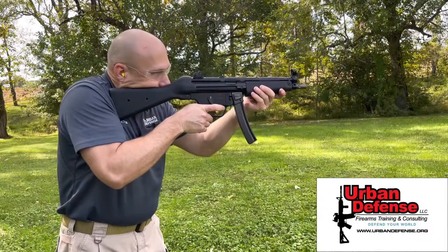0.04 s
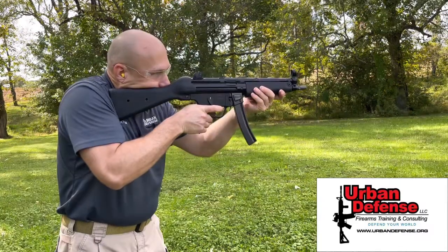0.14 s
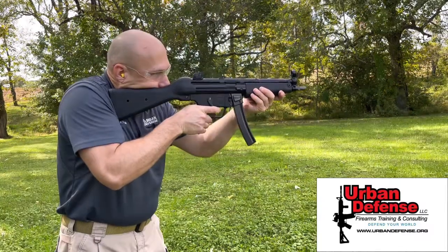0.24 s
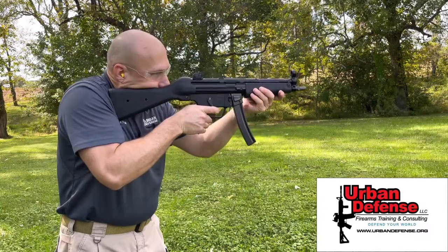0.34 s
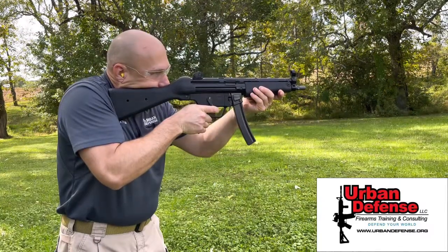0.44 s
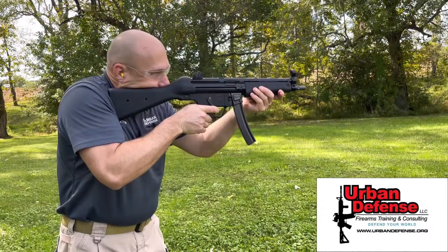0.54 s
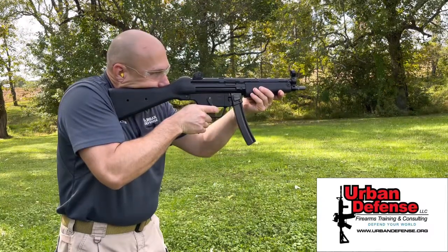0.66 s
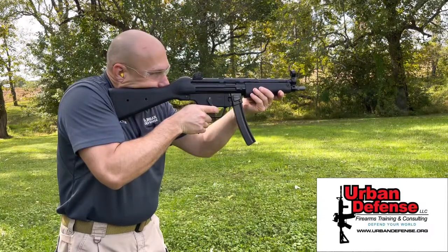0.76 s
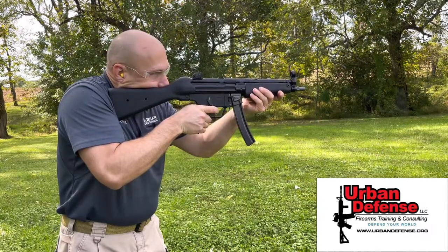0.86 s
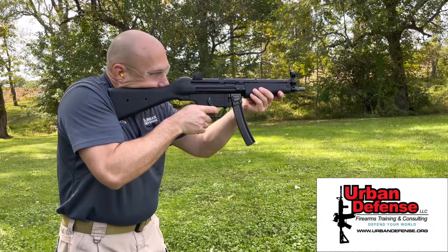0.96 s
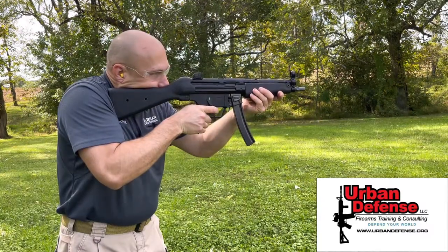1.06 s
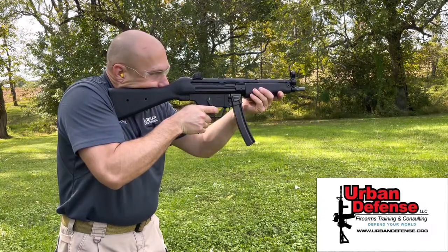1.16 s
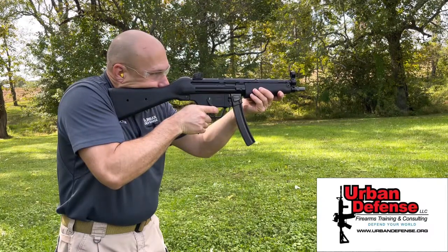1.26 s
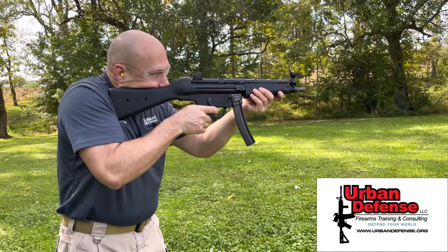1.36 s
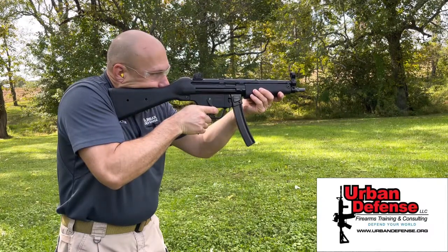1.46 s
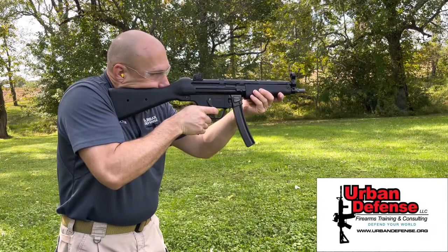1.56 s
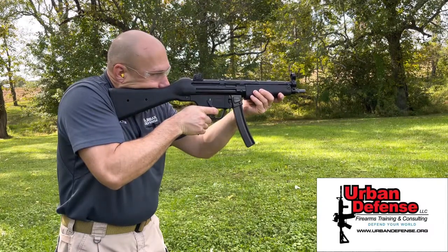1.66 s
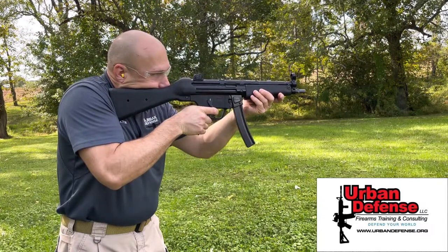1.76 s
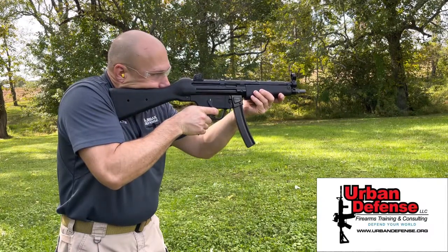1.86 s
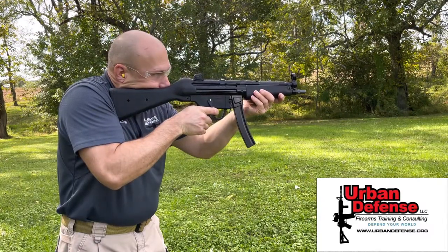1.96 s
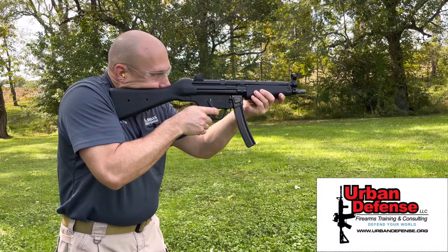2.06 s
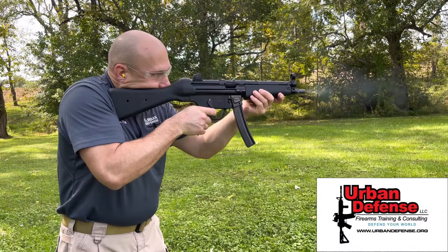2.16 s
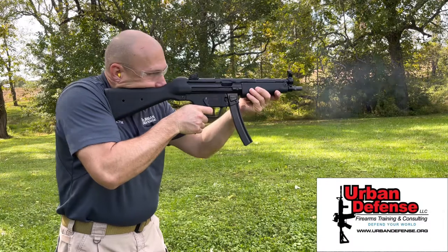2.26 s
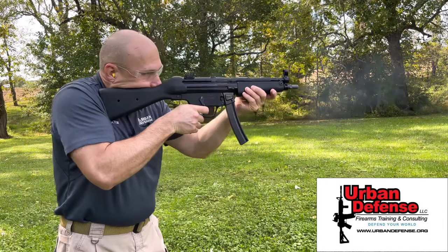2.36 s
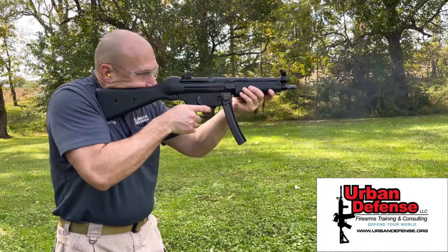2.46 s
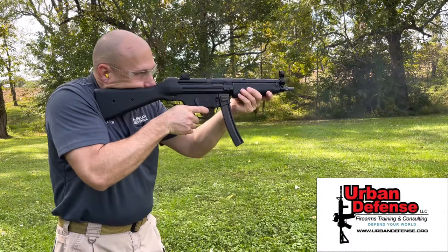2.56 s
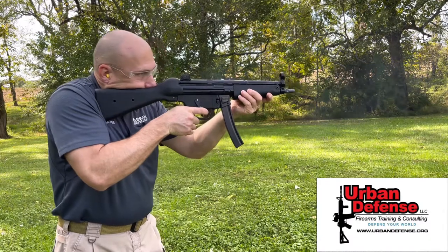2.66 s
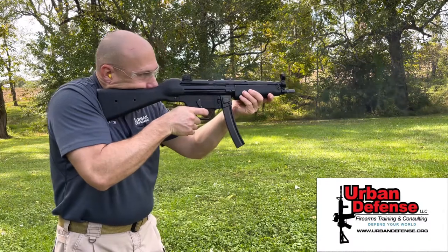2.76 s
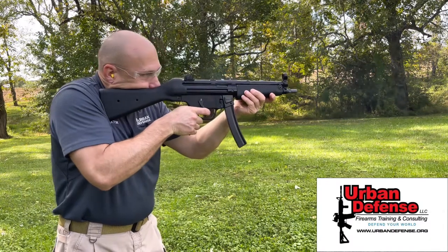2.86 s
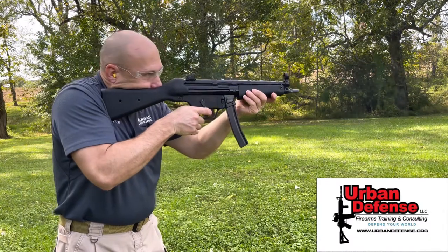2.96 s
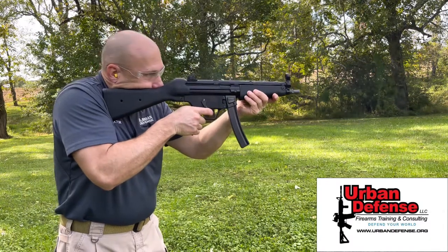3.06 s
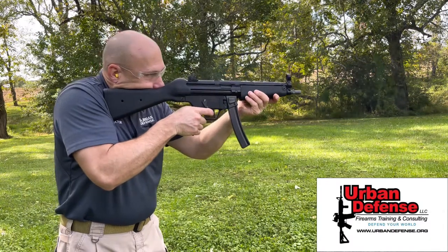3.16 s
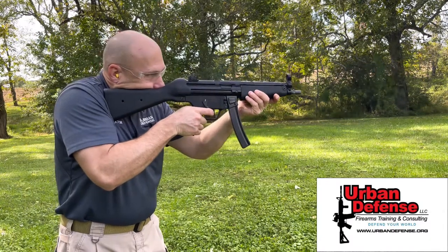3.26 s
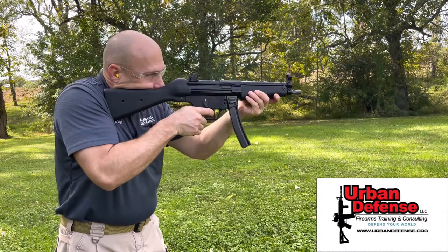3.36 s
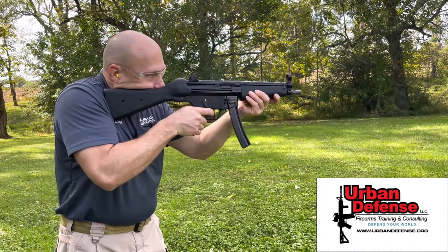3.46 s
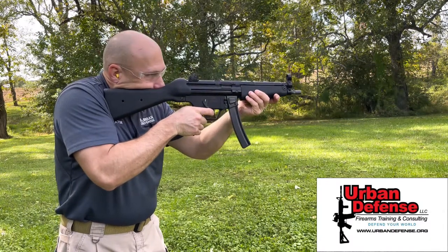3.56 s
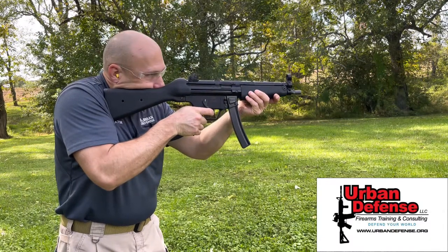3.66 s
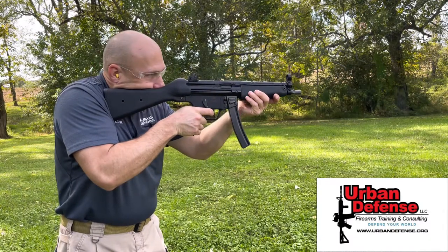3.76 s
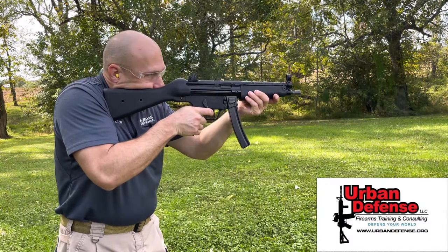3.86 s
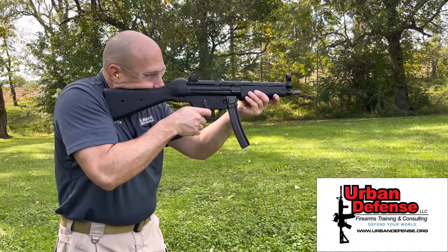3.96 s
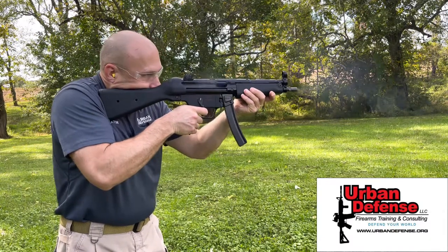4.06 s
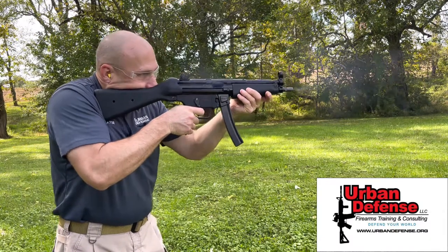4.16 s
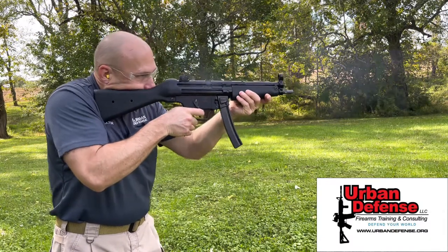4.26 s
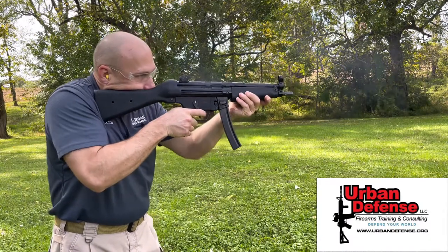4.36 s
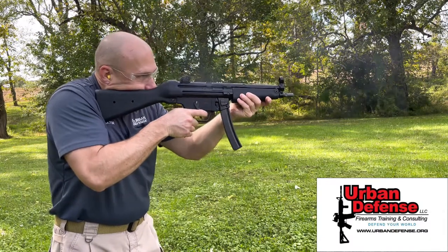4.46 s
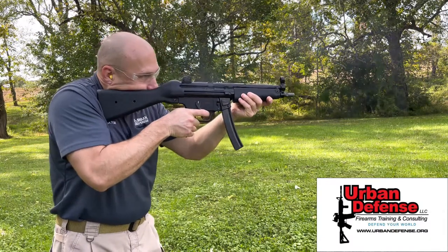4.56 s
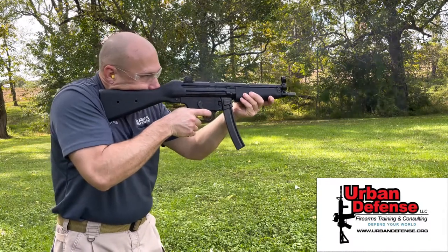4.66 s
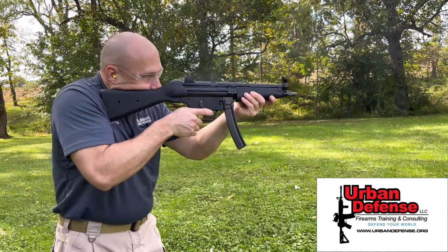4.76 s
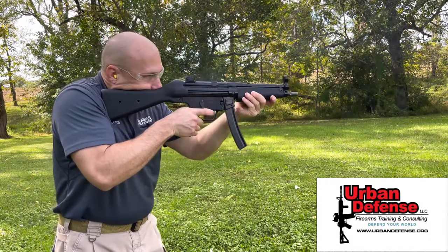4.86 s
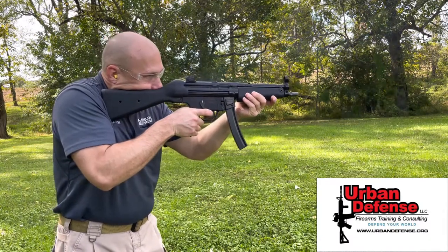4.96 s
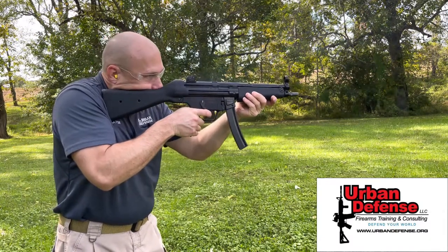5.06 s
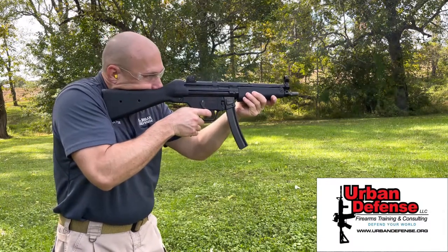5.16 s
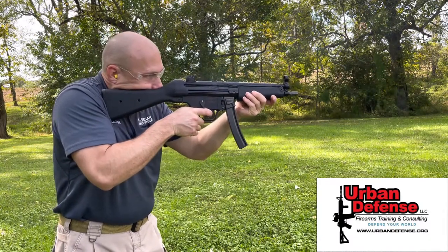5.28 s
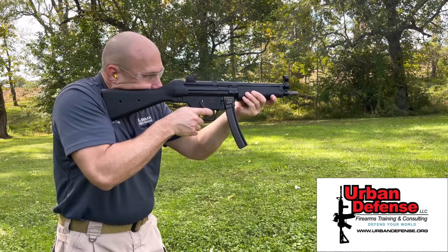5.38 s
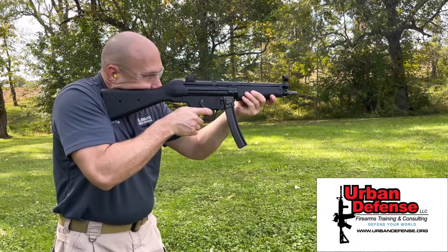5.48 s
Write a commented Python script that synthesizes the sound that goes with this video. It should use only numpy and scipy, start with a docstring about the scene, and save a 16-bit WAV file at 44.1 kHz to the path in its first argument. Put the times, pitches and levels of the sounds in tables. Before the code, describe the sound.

Quiet lawn with low motor hum and insects, then two rapid four-round submachine gun bursts echoing off trees, with small metal clicks between.

```python
"""A submachine gun fires two four-round bursts on a lawn ringed by trees; its bolt clacks between rounds.
Each blast is a dispersed pulse that sweeps downward, returns from the ground and a near surface,
and reverberates in the trees as decaying noise; small metal clicks, noise bursts and rings, follow.
A motor hums in sines and rumbling noise, insects and leaves hiss in filtered noise, a bird whistles
in falling sines; these are plain until the first shot slams the recorder's gain down."""
import sys
import numpy as np
from scipy import signal
from scipy.fft import rfft, irfft, next_fast_len
from scipy.io import wavfile

SR = 44100
rng = np.random.default_rng(int(sys.argv[2]) if len(sys.argv) > 2 else 0)


def to_wav(s):
    """Save 16-bit WAV."""
    ch = np.atleast_2d(s).T  # columns
    pcm = np.round(np.clip(ch, -1, 1) * 32767)  # PCM
    wavfile.write(sys.argv[1], SR, pcm.astype(np.int16))


N = 243415
TIME = np.arange(N) / SR  # s

# Distant motor, tonal lines: (f/Hz, level/dB)
MOTOR_LINES = [(74, -44), (110.3, -46.5), (126, -51.5), (220.7, -45)]
# Distant motor, rumble spectrum: (f/Hz, level/dB)
MOTOR_RUMBLE = [(20, -44.5), (35, -19.5), (55, 1.5), (90, 0.5), (135, -5), (175, -14), (250, -17),
                (310, -18), (600, -46), (2000, -72.5)]
# Chorus of far insects, spectrum: (f/Hz, level/dB)
INSECT_SPECTRUM = [(100, -2.5), (350, 2), (700, 5.5), (1150, 6.5), (1800, -3.5), (3400, -12), (5300, -15.5),
                   (6100, 5), (7500, -4), (8600, -8), (10000, -15), (12000, -30), (16000, -32)]
# Puffs of breeze in the leaves: (t/s at the peak, width/s, level/dB)
GUSTS = [(.61, 0.11, -61), (1.63, 0.165, -56)]
CALM_DB = -68  # the leaves between puffs
# Stirring leaves, spectrum: (f/Hz, level/dB)
LEAF_SPECTRUM = [(300, -21), (800, -3.5), (1200, 4.5), (1700, -4.5), (3400, -10.5), (4700, 5.5), (7000, 1),
                 (11000, -10.5), (16000, -27)]
# Swells of a faint far-off tone: (t/s at the peak, width/s, level/dB)
FAR_SWELLS = [(.55, 0.092, -51.5), (1.0, .07, -55.5)]
# Far-off tone, spectrum: (f/Hz, level/dB)
FAR_TONE_SPECTRUM = [(500, -30), (950, -3), (1200, -1), (1450, -14), (2200, -30), (8000, -60)]
# Nearer insect, narrow-band spectrum: (f/Hz, level/dB)
CRICKET_SPECTRUM = [(6000, -45), (8100, -13.5), (8550, 0), (9000, -14.5), (12000, -46.5)]
# Chirps of a far bird: (t/s, level/dB)
CHIRPS = [(.37, -67), (.85, -66), (1.334, -63), (1.971, -62)]
UPPER_VOICE_HZ, LOWER_VOICE_HZ = 4600, 3000  # nominal starting pitches of a chirp
CHIRP_FALL = .76  # nominal end pitch over start pitch

# Rounds fired: (t/s, strength/dB)
SHOTS = [(2.218, 2), (2.2917, 4), (2.3665, 3.5), (2.4440, 3), (4.0349, 2.5), (4.1080, 2), (4.1854, 0.1),
         (4.2584, -0.04)]
BURST_ROUNDS = 4
CYCLE_S = .0773  # one cycle of the action
LEAD_IN_S, LEAD_IN_DB = .0142, -6  # a rough noise starts this long before a burst's first round
BOLT_LEAD_S, BOLT_DB = 0.015, 11  # the bolt shuts this long before each cycle ends
LAST_BOLT_DB = 0.5  # extra: the closing that ends a burst is harder
RESET_S, RESET_DB = .1055, 3  # the trigger resets this long after a burst's last round
# Lead-in noise, spectrum: (f/Hz, level/dB)
LEAD_IN_SPECTRUM = [(30, -6.5), (200, 13), (330, 4.5), (520, 7.5), (720, -12), (950, 0), (1400, -9),
                    (2300, -0.5), (3100, -6), (4100, -25), (5300, -7.5), (7000, -3), (8500, -18),
                    (16000, -16.5)]
# Bolt closing and trigger reset, spectrum: (f/Hz, level/dB)
BOLT_SPECTRUM = [(60, -14.5), (200, -2), (700, -4), (1800, -1.5), (5300, -4.5), (7700, -4), (9500, 6.5),
                 (12000, 1.5), (16000, -3)]

# Muzzle blast, spectrum: (f/Hz, level/dB)
BLAST_SPECTRUM = [(25, -9.5), (50, -3.5), (120, 10), (200, 6), (400, 4), (620, 6), (1000, -6), (1900, -5),
                  (4000, -17), (9000, -21.5), (16000, -24)]
# Reflection from the near surface, spectrum: (f/Hz, level/dB)
SLAP_SPECTRUM = [(25, -16), (55, 4), (120, 6), (250, -5), (500, -3), (900, 0), (1600, -9), (3000, -14.5),
                 (8000, -27.5), (16000, -34.5)]
# Crack and scatter of the blast, spectrum: (f/Hz, level/dB)
CRACKLE_SPECTRUM = [(40, -17), (300, 2), (900, 6), (2000, 4), (3500, -5.5), (6000, -5.5), (10000, -8),
                    (16000, -5)]
# Action rattling as the bolt flies back, spectrum: (f/Hz, level/dB)
RATTLE_SPECTRUM = [(40, -4.5), (200, 7), (600, 9), (2000, 1.5), (4000, 0), (7000, -4), (10000, 0),
                   (16000, -3.5)]
# Blast at the far port relative to the near one: (f/Hz, level/dB)
FAR_PORT_SHADE = [(60, 2), (150, -2), (500, -3), (1500, -9), (5000, -9), (10000, 4)]
SLAP_DB, TREES_DB = 17, -2.5  # the echoes of a round of strength 0 dB

# Echo from the trees, spectrum: (f/Hz, level/dB)
TREE_SPECTRUM = [(25, -11), (50, -1), (110, -5), (290, -12.5), (520, -4), (1000, -6), (2100, -2),
                 (3300, -9.5), (5000, -6), (7500, -10), (10000, -2), (16000, -15.5)]
# Decay time of the trees' echo, for a fall of 60 dB: (f/Hz, T60/s)
TREE_T60 = [(50, .6), (200, 1.2), (600, 1.74), (2000, 1.455), (5000, 1), (9000, 0.61), (15000, 0.23)]
# Stands of trees that answer each shot: (delay/s, width/s, level/dB)
STANDS = [(.125, 0.011, 4.5), (0.241, 0.045, 3), (.32, 0.02, 6.5), (.43, 0.22, 6)]

# Clicks of spent cases and of handling: (t/s, tick level/dB, tick f/Hz, knock level/dB)
CLICKS = [(3.2317, -16.5, 5030, -36), (3.3725, -8, 2420, -11), (3.4204, -11, 2300, -15.5),
          (3.491, -25, 4500, -40), (3.53, -34, 2200, -25), (3.585, -26.5, 8400, -24.5),
          (3.717, -37, 2200, -28.5), (4.991, -10.5, 3120, -16.5), (5.137, -21, 5120, -47),
          (5.326, -22.5, 1990, -17)]
# Tick of steel, spectrum before its resonance: (f/Hz, level/dB)
TICK_SPECTRUM = [(100, 7), (1200, -4), (2700, 5), (3800, -2), (5200, 0), (7000, 2.5), (9000, -8.5),
                 (16000, -6.5)]
# Duller knock, spectrum: (f/Hz, level/dB)
KNOCK_SPECTRUM = [(60, -6), (300, -1.5), (570, 3), (1000, 0), (2000, 0), (3500, -15.5), (8000, -23),
                  (16000, -18)]
# Ringing modes of the metal: (f/Hz, level/dB, T60/s)
METAL_MODES = [(626, -5, 0.2), (1880, -21, 0.062), (2100, 0, 0.055), (2340, 0, 0.097), (4540, -5, 0.056),
               (7000, -6, 0.075), (8370, -5, 0.058)]
TICK_T60, KNOCK_T60, RING_DB = 0.034, .11, -8  # decays (s); the metal's ring relative to the knock
TICK_RISE_DB, TICK_OCTAVES = 10, 0.25  # height and width of the resonance that gives a tick its pitch

# Stereo width of diffuse noise: (f/Hz, side minus mid level/dB)
STEREO_WIDTH = [(50, -13.5), (130, -15), (250, -4.5), (500, 4), (1000, 6), (2000, 0), (4000, 0),
                (16000, -1)]
# Recorder's own hiss, spectrum: (f/Hz, level/dB)
HISS_SPECTRUM = [(30, -16), (130, 8.5), (500, 0.5), (1800, 0), (3500, -7.5), (8000, -14.5), (11000, -15),
                 (16000, -20)]
# Microphone's frequency response: (f/Hz, level/dB)
MIC_RESPONSE = [(7200, -1.5), (8700, 4), (9700, 2), (10300, -7.5), (11000, 3.5), (12200, -2), (13600, -24),
                (15000, -18), (16000, -18.5)]
TOP_HZ = 16050  # middle of the upper band edge


def amp(db):
    """Amplitude ratio: twenty decibels make a factor of ten."""
    return 10 ** (np.asarray(db) / 20)


def unit(x):
    """Normalization: scale to rms 1."""
    return x / np.sqrt(np.mean(x ** 2) + 1e-20)


def along(points, hz):
    """Interpolation of (f/Hz, value) points on a logarithmic frequency axis."""
    f, v = np.transpose(points)
    return np.interp(np.log(hz + 1), np.log(f + 1), v)


def filtered(x, response):
    """Linear filtering: the spectrum of x times a response that is a function of frequency."""
    n = x.shape[-1]
    m = next_fast_len(n + SR // 4)
    spectrum = rfft(x, m) * response(np.fft.rfftfreq(m, 1 / SR))
    return irfft(spectrum, m)[..., :n]


def noise(spectrum, size):
    """Diffuse field: coloured stereo noise of rms 1, alike in the bass and wide in the mids."""
    m = next_fast_len(size, real=True)
    hz = np.fft.rfftfreq(m, 1 / SR)
    angle = np.arctan(amp(along(STEREO_WIDTH, hz)))  # shares the power between mid and side
    gain = amp(along(spectrum, hz)) * np.array([np.cos(angle), np.sin(angle)])
    white = rng.standard_normal((2, m))
    mid, side = irfft(rfft(white) * gain, m)[:, :size]
    return unit(np.array([mid + side, mid - side]))


def wobble(rate, size):
    """Slow random fluctuation: straight lines through rate normal knots a second."""
    knots = rng.standard_normal(int(size * rate / SR) + 2)
    return np.interp(TIME[:size] * rate, np.arange(len(knots)), knots)


def swells(rows):
    """Gaussian envelopes: summed gain of (t/s, width/s, level/dB) swells."""
    return sum(amp(db) * np.exp(-((TIME - s) / width) ** 2) for s, width, db in rows)


def add(track, s, sound):
    """Superposition: mix a sound into the track from time s on."""
    part = track[:, round(s * SR):][:, :sound.shape[-1]]
    part += sound[..., :part.shape[-1]]


def pan(right_db):
    """Level difference between channels: gains for a source that leans to the right."""
    return amp([[-right_db / 2], [right_db / 2]])


def noise_burst(spectrum, t60, attack, size=7200):
    """Damped impact: coloured noise rises fast, decays exponentially and tapers to nothing."""
    t = TIME[:size]
    rise = 1 - np.exp(-t / attack)
    decay = amp(-60 * t / t60)
    taper = 1 - (t / t[-1]) ** 2
    return noise(spectrum, size=size) * decay * rise * taper


def shock(spectrum, lag, corner_hz, turn, spread, size=8192):
    """Dispersion: a pressure pulse whose bass arrives up to lag (s) late sweeps downward."""
    hz = np.fft.rfftfreq(size, 1 / SR)
    # the delay at each frequency is lag / (1 + hz / corner_hz); turn is a constant phase (rad)
    phase = turn - 2 * np.pi * lag * corner_hz * np.log1p(hz / corner_hz)
    near = amp(along(spectrum, hz)) * np.exp(1j * phase)
    # spread is the phase between the ports (rad)
    far = near * amp(along(FAR_PORT_SHADE, hz)) * np.exp(1j * spread)
    pulse = irfft(np.array([far, near]))[:, :size // 2]
    return pulse / np.sqrt(np.sum(pulse ** 2) / (SR / 100))  # equal energy for every pulse


def background(port_delay=0.00061):
    """Incoherent sum: motor lines and rumble under insects, stirring leaves and a faint far-off tone."""
    hum = np.zeros(N)
    for hz, db in MOTOR_LINES:
        level = amp(db + 1.3 * wobble(6.7, size=N)) * np.sqrt(2)  # rms to peak
        hum += level * np.sin(2 * np.pi * hz * TIME + .3 * wobble(3.5, size=N))
    # the hum reaches the left port first, the right one port_delay (s) later
    hum = np.array([hum, np.interp(TIME - port_delay, TIME, hum)])
    rumble = amp(-44.5) * noise(MOTOR_RUMBLE, size=N)
    insects = amp(-51.5 + 1.4 * wobble(21, size=N)) * noise(INSECT_SPECTRUM, size=N)
    leaves = (amp(CALM_DB) + swells(GUSTS)) * noise(LEAF_SPECTRUM, size=N)
    far_tone = swells(FAR_SWELLS) * noise(FAR_TONE_SPECTRUM, size=N)
    return (hum + rumble) * pan(.8) + (insects + leaves + far_tone) * pan(0.9)


def cricket(rate=4.0, first_s=.015, db=-64):
    """Amplitude modulation: one nearer insect pulses narrow-band noise, rate chirps a second."""
    chirping = np.cos(np.pi * rate * (TIME - first_s)) ** 4
    return amp(db) * chirping * noise(CRICKET_SPECTRUM, size=N)


def bird(length=0.041, waver=0.043):
    """Frequency modulation: quick two-voiced whistles fall in pitch with a random waver."""
    out = np.zeros((2, N))
    u = np.linspace(0, 1, round(length * SR))  # progress through a chirp
    for s, db in CHIRPS:
        for start_hz in (UPPER_VOICE_HZ, LOWER_VOICE_HZ):
            pitch = start_hz * CHIRP_FALL ** u * (1 + waver * wobble(265, size=len(u)))
            whistle = np.sin(2 * np.pi * np.cumsum(pitch) / SR)
            add(out, s, amp(db) * np.sin(np.pi * u) * whistle)
    return out


def action():
    """Damped noise: a rough lead-in to each burst, the bolt closing in every cycle, the trigger reset."""
    out = np.zeros((2, N))
    for rounds in np.reshape([s for s, _ in SHOTS], (-1, BURST_ROUNDS)):
        # a rough noise burst starts just before a burst's first round
        lead_in = noise_burst(LEAD_IN_SPECTRUM, t60=0.66, attack=0.0033)
        add(out, rounds[0] - LEAD_IN_S, amp(LEAD_IN_DB) * lead_in)
        # a cycle ends at the next round, or after CYCLE_S when there is none
        cycles = [(s, 0) for s in rounds[1:]] + [(rounds[-1] + CYCLE_S, LAST_BOLT_DB)]
        for cycle_end, extra_db in cycles:
            bolt = noise_burst(BOLT_SPECTRUM, t60=0.026, attack=0.0003)
            add(out, cycle_end - BOLT_LEAD_S, amp(BOLT_DB + extra_db) * bolt)
        reset = noise_burst(BOLT_SPECTRUM, t60=0.045, attack=0.0011)
        add(out, rounds[-1] + RESET_S, amp(RESET_DB) * reset)
    return out


def blasts(ground_delay=.0048, slap_delay=.0192, stray_db=4, stray_spread=0.022):
    """Reflection: a blast arrives directly, off the ground and off a near surface, trailing crackle."""
    out = np.zeros((2, N))
    slap = shock(SLAP_SPECTRUM, lag=0.018, corner_hz=92, turn=0.71, spread=2.13)
    # gun and shooter scatter every round in the same way
    scatter = noise_burst(CRACKLE_SPECTRUM, t60=0.12, attack=0.0016)
    for s, db in SHOTS:
        turn = 1.6 + rng.normal(0, 0.92)
        pulse = shock(BLAST_SPECTRUM, lag=.021, corner_hz=102.8, turn=turn, spread=1.75)
        crack = noise_burst(CRACKLE_SPECTRUM, t60=0.036, attack=0.00045) * pan(15.0)
        add(out, s, amp(db + 19.0) * pulse)
        add(out, s + ground_delay, amp(db + 16.5) * pulse)
        add(out, s + slap_delay, amp(db + SLAP_DB) * slap)
        # weaker reflections follow the slap at uneven delays
        for late in rng.random(3):
            add(out, s + slap_delay + late * stray_spread, amp(db + stray_db - 10 * late) * slap)
        add(out, s - .0005, amp(db + 15.0) * crack)
        add(out, s + ground_delay, amp(db + 11) * crack)
        add(out, s, amp(db + 13.0) * scatter * pan(2.7))
        # the action rattles while the bolt flies back
        rattle = noise_burst(RATTLE_SPECTRUM, t60=0.2, attack=0.0023)
        add(out, s, amp(db + 11.5) * rattle * pan(1.5))
    return out


def trees(far_db=-42, far_t60=3, patchy_db=2.5, rise=0.06, size=72000):
    """Reverberation: trunks and leaves return every shot in a few swells; the treble dies first."""
    hz, t, z = signal.stft(noise(TREE_SPECTRUM, size=size), SR, nperseg=256)
    near = amp(-60 * t / along(TREE_T60, hz)[:, None])
    # a weak, slow tail with little treble
    far = amp(far_db - 60 * t / far_t60) / (1 + (hz[:, None] / 3000) ** 2)
    stands_db = sum(db * np.exp(-((t - delay) / width) ** 2) for delay, width, db in STANDS)
    swell = amp(stands_db) * (1 - np.exp(-t / rise))
    echo = signal.istft(z * (near + far) * swell, SR, nperseg=256)[1][:, :size]
    out = np.zeros((2, N))
    for s, db in SHOTS:
        patches = patchy_db * wobble(140, size=size)
        add(out, s, amp(db + TREES_DB + patches) * echo)
    return out * pan(1)


def metal_ring(t):
    """Modal vibration: each mode of the metal is a decaying sine, out of phase between channels."""
    ring = 0
    for hz, db, t60 in METAL_MODES:
        decay = amp(db + rng.normal(0, 1.4) - 60 * t / t60)
        ring = ring + decay * np.sin(2 * np.pi * hz * t + np.array([[0], [2.3]]))
    return ring


def clicks():
    """Contact excitation: a bright, pitched tick over a duller knock, which sets the metal ringing."""
    out = np.zeros((2, N))
    for s, tick_db, tick_hz, knock_db in CLICKS:
        def resonance(hz):
            """Resonance: a Gaussian peak on an octave axis, set above a lowered floor."""
            octaves = np.log2((hz + 1) / tick_hz)
            return amp(TICK_RISE_DB * (np.exp(-(octaves / TICK_OCTAVES) ** 2) - .4))

        ring = metal_ring(TIME[:SR // 10])
        tick = filtered(noise_burst(TICK_SPECTRUM, t60=TICK_T60, attack=0.00026), resonance)
        knock = noise_burst(KNOCK_SPECTRUM, t60=KNOCK_T60, attack=0.0012)
        add(out, s, amp(tick_db) * tick)
        add(out, s, amp(knock_db) * knock)
        add(out, s, amp(knock_db + RING_DB) * ring)
    return out * pan(2.8)


def scene():
    """Superposition of the gun, its echoes and the lawn around it."""
    return background() + cricket() + bird() + action() + blasts() + trees() + clicks()


def record(dry, threshold_db=3.0, depth_db=30, slope=1.2, overshoot=0.27,
           bite_s=0.0067, settle_s=0.22, top=0.71):
    """Gain control by peak hold, with overshoot; then hiss, microphone colour, soft clipping, band limit."""
    # the loudest peak so far sets the cut, which never recovers
    peak_db = 20 * np.log10(np.maximum.accumulate(np.abs(dry).max(axis=0)) + 1e-9)
    cut_db = np.clip(slope * (peak_db - threshold_db), 0, depth_db)
    # each increase of the cut overshoots, then settles
    dip = np.exp(-TIME / settle_s) * (1 - np.exp(-TIME / bite_s))
    dip_db = overshoot * signal.fftconvolve(np.diff(cut_db, prepend=0), dip)[:N]
    controlled = dry * amp(-cut_db - dip_db)
    hiss = amp(-75.0) * noise(HISS_SPECTRUM, size=N)
    coloured = filtered(controlled + hiss, lambda hz: amp(along(MIC_RESPONSE, hz)))
    clipped = coloured / (1 + (coloured / top) ** 4) ** (1 / 4)  # approaches +-top
    return filtered(clipped, lambda hz: np.clip((TOP_HZ - hz) / 300 + .5, 0, 1))


dry = scene()
out = record(dry)
to_wav(out)
```